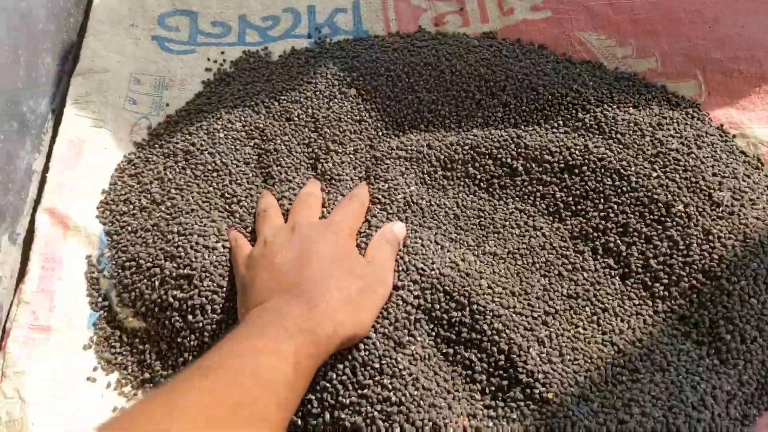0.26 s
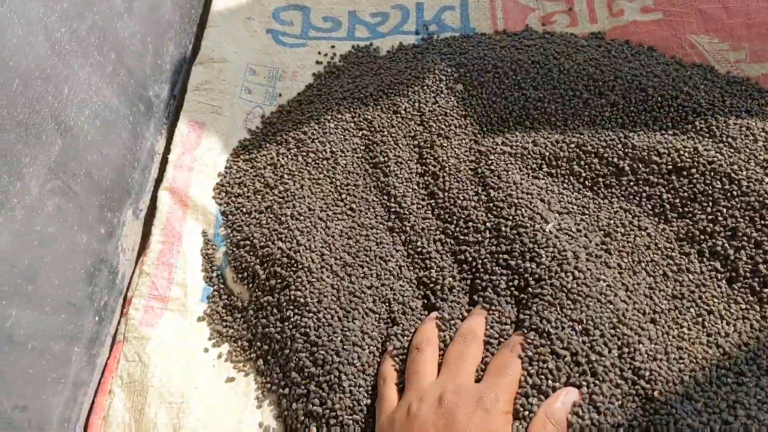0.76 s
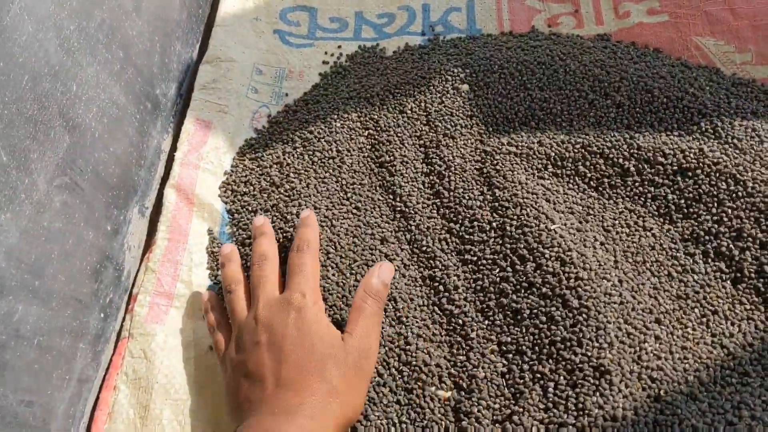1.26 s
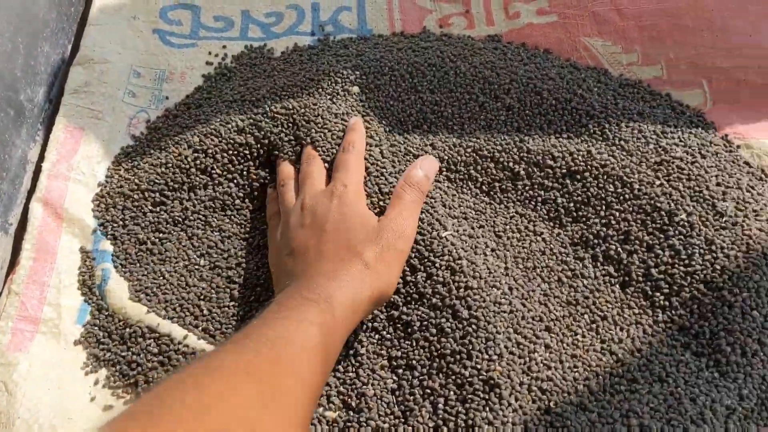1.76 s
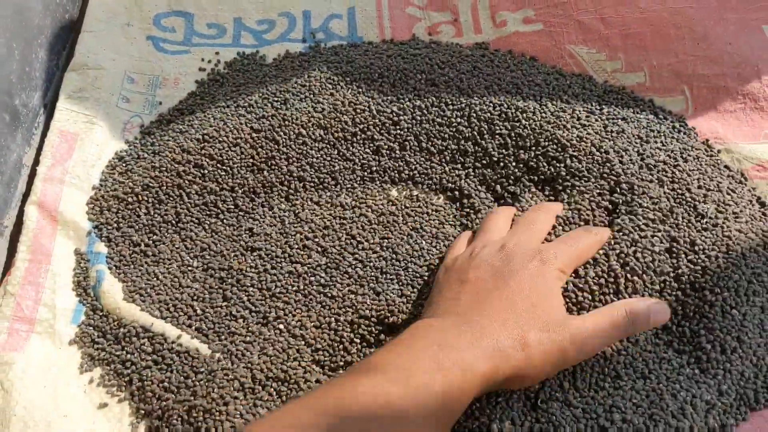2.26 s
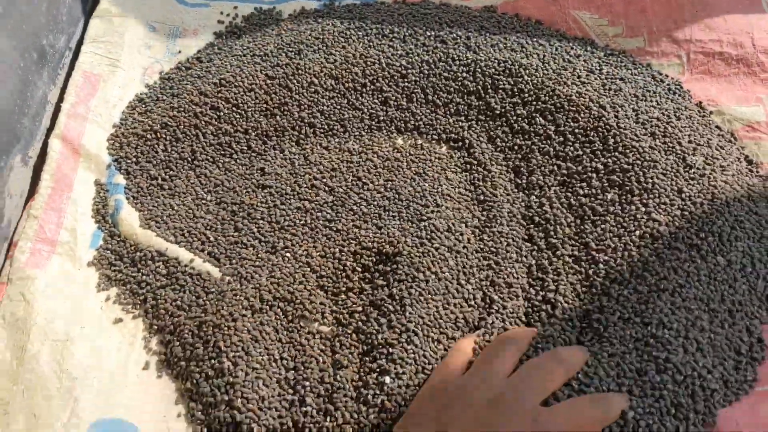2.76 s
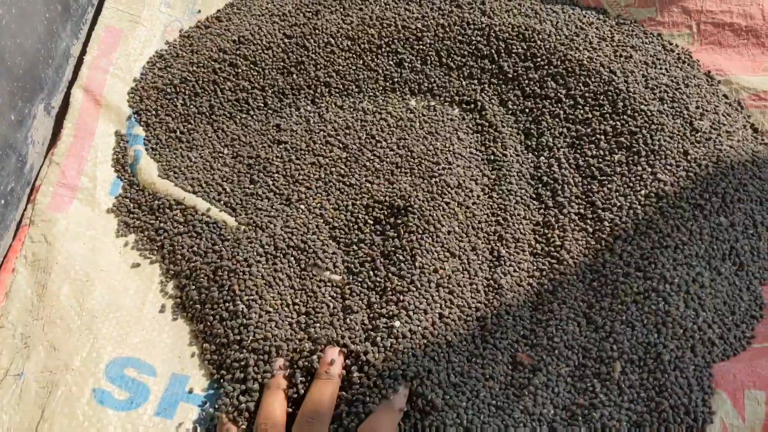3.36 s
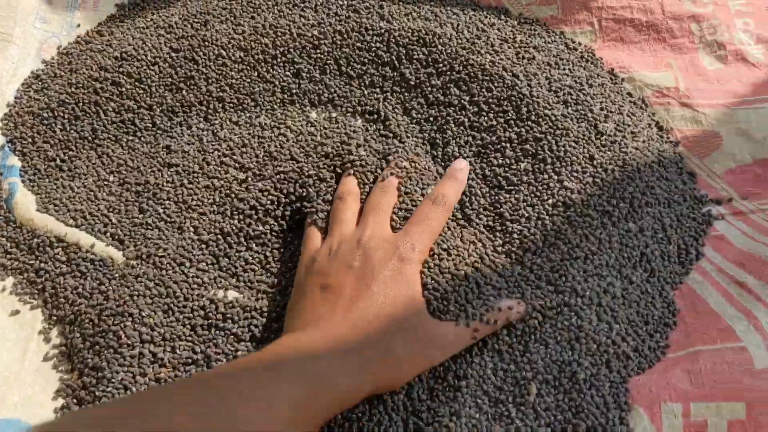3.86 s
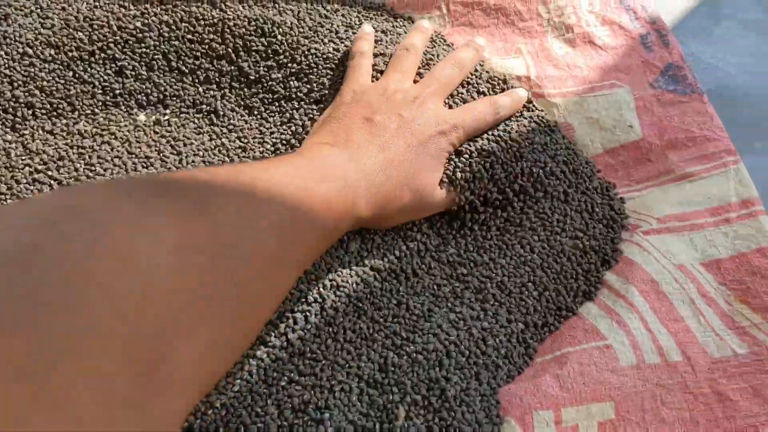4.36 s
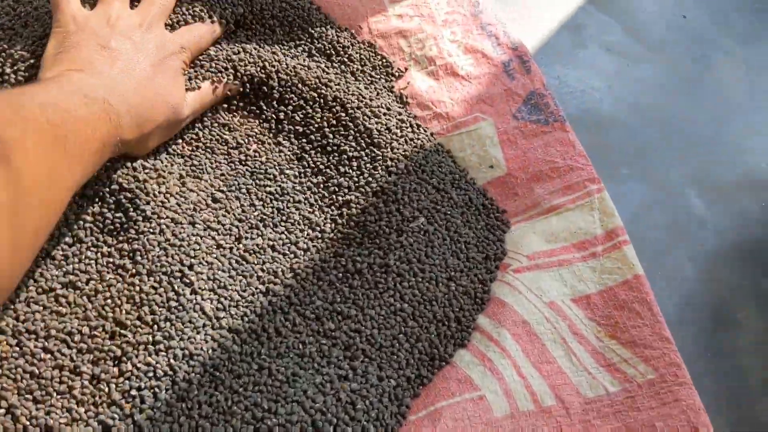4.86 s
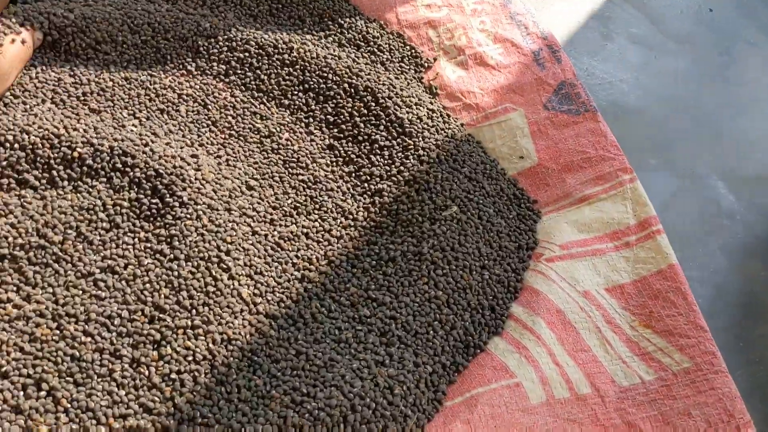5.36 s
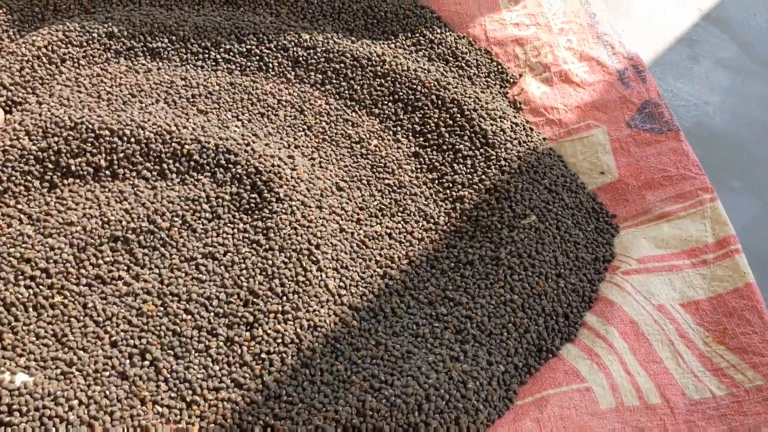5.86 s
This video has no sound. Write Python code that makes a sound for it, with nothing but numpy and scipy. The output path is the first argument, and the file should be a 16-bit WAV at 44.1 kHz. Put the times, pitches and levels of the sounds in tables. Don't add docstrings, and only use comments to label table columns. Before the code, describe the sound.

A hand sweeps a heap of small dry seeds on a woven plastic sack, crunching, scraping and hissing, with light wind puffs outdoors.

```python
import sys
import numpy as np
from scipy import signal
from scipy.fft import rfft, irfft
from scipy.io import wavfile
from scipy.ndimage import uniform_filter1d

SR = 44100
rng = np.random.default_rng(int(sys.argv[2]) if len(sys.argv) > 2 else 0)


def log_audio(samples):
    frames = np.atleast_2d(samples).T
    limited = np.clip(frames, -1, 1)
    pcm = np.round(limited * 32767).astype(np.int16)
    wavfile.write(sys.argv[1], SR, pcm)


N = 269010


def gain_of(db):
    return 10 ** (np.asarray(db) / 20)


def evened(x):
    return x / np.sqrt(np.mean(x ** 2) + 1e-20)


def read(points, hz):
    f, value = np.transpose(points)
    return np.interp(np.log(hz + 1), np.log(f + 1), value)


def along(rows, column):
    columns = np.transpose(rows)
    return np.interp(np.arange(N) / SR, columns[0], columns[column])


def sides(db):
    return gain_of(np.multiply.outer([0.5, -0.5], db))


def add(mix, s, sound):
    part = mix[:, round(s * SR):][:, :sound.shape[1]]
    part += sound[:, :part.shape[1]]


def drift(per_s):
    t = np.arange(0, N + 64, 64) / SR
    slow = sum(np.sin(2 * np.pi * (f * t + rng.random())) for f in np.geomspace(3, per_s, num=24))
    return evened(np.interp(np.arange(N) / SR, t, slow))


def swelling(s, rise, fall, db):
    t = np.arange(0, N, 8) / SR - s
    level_db = db - 9 * (t / np.where(t < 0, rise, fall)) ** 2
    return np.repeat(gain_of(2 * level_db), 8)[:N]


def humps_db(rows):
    t = np.arange(N) / SR
    return sum(db * np.exp(-((t - s) / half) ** 2) for s, half, db in rows)


# (pitch_hz, share)
SAME_AT_PORTS = [(60, 0.91), (200, 0.94), (450, 0.78), (750, 0.87), (1200, 0.67), (1600, 0.48),
                 (2000, 0.22), (3300, 0.35), (6000, 0.24), (15000, 0.031)]


def port_pair(hz, shared_left, shared_right, private):
    alike = np.clip(read(SAME_AT_PORTS, hz), 0, 1)
    return np.sqrt(alike) * np.array([shared_left, shared_right]) + np.sqrt(1 - alike) * private


# (pitch_hz, level_db per Hz)
HUM_COLOUR = [(15, -67), (25, -70), (35, -73), (48, -19), (70, -7), (102, -16), (139, -1), (205, -9),
              (221, -7), (272, -29), (330, -32.5), (430, -23), (730, -120)]
# (peak_s, half_length_s, level_db)
HUM_SWELLS = [
    (.0, 0.45, 2.5),
    (1.05, 0.4, 3),
    (1.75, .15, -4),
    (2.45, 0.68, 1.5),
    (3.9, 0.22, -3.5),
    (4.198, 0.17, 1.5),
    (5.14, 0.28, 3),
    (5.45, 0.14, -3.5),
]
# (pitch_hz, level_db, width_hz)
MOTOR_NOTE = (198, -64.5, 3.6)


def hum():
    hz = np.fft.rfftfreq(N, 1 / SR)
    shared, left, right = rfft(rng.standard_normal((3, N)))
    pair = port_pair(hz, shared, shared, np.array([left, right]))
    air = evened(irfft(pair * gain_of(read(HUM_COLOUR, hz)), N))
    air = air * gain_of(-54.5 + humps_db(HUM_SWELLS))
    note_hz, note_db, width = MOTOR_NOTE
    motor = evened(irfft(pair / (1 + (2 * (hz - note_hz) / width) ** 2), N))
    return air + gain_of(note_db) * motor


# (pitch_hz, level_db per Hz)
GUST_COLOUR = [(20, -36), (40, 4), (70, -4.5), (82, 10), (160, -6.5), (300, -43)]
# (peak_s, rise_s, level_db, left_minus_right_db, pitch_factor)
WIND_PUFFS = [
    (1.12, 0.081, -50, -3, 1.2),
    (1.196, 0.018, -36.5, 1, 1.45),
    (1.232, 0.022, -28.5, 2, 1.28),
    (1.34, 0.092, -47.5, 1, 1.1),
    (1.53, 0.027, -35.5, 1, 1.47),
    (1.6, 0.066, -45, 1, 1.35),
    (1.672, 0.034, -38.5, -3, 1.4),
    (4.04, 0.047, -45.5, -2, 0.87),
    (4.13, 0.085, -45.5, 0, 1.23),
    (4.22, 0.067, -41.5, 1, 0.91),
]


def wind():
    hz = np.fft.rfftfreq(N, 1 / SR)
    out = np.zeros((2, N))
    white = rfft(rng.standard_normal((2, N)))
    for s, rise, db, pan, pitch in WIND_PUFFS:
        lumps = irfft(white * gain_of(read(GUST_COLOUR, hz / pitch)), N)
        lumps /= np.sqrt(abs(uniform_filter1d(lumps ** 2, size=2500, axis=1)) + 1e-12)
        puff = swelling(s, rise, 0.69 * rise, db)
        out += lumps * np.sqrt(puff) * sides(pan)[:, None]
    return out


# (pitch_hz, late_ms)
LEFT_LATE = [(300, .02), (600, 0.048), (950, 0.24), (1300, 0.25), (1700, 0.35), (3000, 0.51),
             (5000, 0.5175)]
# (time_s, share of the delay)
HAND_BEARING = [(0.0, 1.35), (.5, 1.13), (.8, 1), (1.05, 0.71), (1.35, 0.09), (1.6, 0.97), (1.95, 1.07),
                (2.25, 0.63), (2.55, 0.65), (2.8, 0.094), (3.15, 0.26), (3.45, .6), (3.75, 0.85),
                (4.1, 0.86), (4.35, 0.58), (4.65, 0.81), (5.2, 1.18), (6.1, 1.38)]


def lag_s(hz, s):
    follows = np.clip((2300 - hz) / 800, 0, 1)
    bearing = np.interp(s, *np.transpose(HAND_BEARING))
    return read(LEFT_LATE, hz) / 1000 * (1 + follows * (bearing - 1))


def rings(rows, cycles):
    out = np.zeros((2, N))
    t = np.arange(6000) / SR
    for s, db, hz, scuff_s, pan in rows:
        ring = t * gain_of(-120 * t * hz / cycles) * np.sin(2 * np.pi * hz * t)
        scuff = rng.standard_normal(len(t)) * (t < scuff_s)
        knock = signal.fftconvolve(ring, scuff)
        late = round(lag_s(hz, s) * SR)
        pair = np.array([np.roll(knock, late), knock]) / abs(knock).max()
        add(out, s, gain_of(db) * sides(pan)[:, None] * pair)
    return out


# (start_s, peak_db, pitch_hz, push_s, left_minus_right_db)
WIND_BLOWS = [
    (1.183, -31, 80, .002, 8),
    (1.223, -24, 85.5, .002, 11),
    (1.522, -33, 110, .002, -4),
    (4.16, -38.5, 58, .002, 4),
]


def buffets():
    return rings(WIND_BLOWS, cycles=8.7)


# (start_s, peak_db, pitch_hz, scuff_s, left_minus_right_db)
GRIP_KNOCKS = [
    (4.195, -37.5, 640, 0.0099, 3),
    (6.008, -26.5, 440, 0.00054, 3),
    (6.049, -25, 447, 0.00073, 2),
    (6.0978, -26, 605, 0.0005, .3),
]
# (start_s, peak_db, pitch_hz, scuff_s, left_minus_right_db)
RING_CLICKS = [
    (4.1756, -25.5, 2550, .0004, 12),
    (4.178, -23, 2450, .0004, 12),
    (4.179, -29.5, 3550, .0004, 12),
    (4.1803, -22, 2650, .0004, 12),
    (4.179, -36, 4400, .001, 10),
    (4.1785, -36, 1600, .002, 8),
    (4.183, -32, 2800, .0004, 12),
]


def case_taps():
    return rings(GRIP_KNOCKS, cycles=10.6) + rings(RING_CLICKS, cycles=21)


# (start_s, peak_db, pitch_hz, scuff_s, left_minus_right_db)
SACK_RUBS = [(1.505, -38, 1160, 0.02, 3), (1.556, -44, 706, 0.013, 2), (1.78, -34, 1880, 0.026, -1),
             (2.065, -36, 1960, 0.0089, 2), (2.262, -39, 1100, .014, 3), (2.30, -41, 690, .03, 1),
             (2.655, -43, 398, .025, 0), (2.672, -36, 750, 0.016, 0), (2.64, -38, 1060, 0.018, 1),
             (2.72, -40, 640, 0.015, 0), (2.745, -35, 940, 0.026, 0), (2.795, -35, 786, .03, -4),
             (2.915, -40.5, 377, .07, 1), (2.955, -43, 600, 0.015, 0), (3.05, -56, 403, 0.063, -1),
             (3.49, -38, 1350, .02, 2), (3.57, -38, 756, .03, -2), (3.605, -39, 1160, .02, -1),
             (3.70, -35, 1820, .02, 3), (4.187, -44, 3500, .003, 6), (4.193, -44, 4200, 0.0059, 4),
             (4.08, -40, 2052, 0.045, 1), (4.62, -29, 4200, .04, 5), (4.99, -38, 503, 0.053, 0),
             (5.055, -41, 520, 0.014, 0), (5.105, -41, 635, .02, 0), (5.17, -41, 654, 0.033, 4),
             (5.323, -45, 483, .008, -2), (1.10, -38, 1700, .06, 1), (1.17, -37, 1590, 0.049, -1),
             (1.76, -42, 763, 0.071, 1), (2.69, -37, 1500, .04, -3), (2.684, -37, 2100, 0.0018, 0),
             (2.632, -40, 1900, .002, -1), (4.34, -35, 2100, .02, 1), (5.65, -40, 1500, 0.14, 1),
             (5.78, -39, 1550, .1, 1), (1.0, -35, 2000, .1, -1), (2.19, -38, 1320, .04, 2)]


def rubs():
    return rings(SACK_RUBS, cycles=28)


# (start_s, peak_db, pitch_hz, scuff_s, left_minus_right_db)
GAP_SCRAPES = [(.011, -33, 2230, .04, 2), (.101, -36, 1850, 0.034, 0), (.121, -38, 683, 0.019, 3),
               (.166, -31, 1700, 0.058, 5), (.236, -32, 1730, .02, 0), (1.056, -33, 2500, 0.032, 7),
               (1.076, -33, 1500, .03, -5), (1.483, -27.5, 1180, .004, 9), (1.496, -33.5, 1190, 0.04, 2),
               (1.498, -32.5, 680, 0.016, 0), (1.546, -36.5, 1280, .025, 4), (2.177, -34, 1250, .03, 8),
               (2.221, -40, 1200, 0.092, 1), (2.366, -38, 1270, 0.06, 7), (2.453, -36.5, 1250, 0.039, 7),
               (2.778, -27, 1620, 0.039, -6), (2.821, -28, 1880, .02, 5), (2.886, -30, 2410, 0.033, 2),
               (2.906, -34, 1500, 0.026, 2), (2.961, -35, 1500, 0.04, -2), (2.99, -28, 2500, 0.026, 6),
               (3.076, -31, 2430, 0.038, 0), (3.241, -27, 2300, 0.017, -2), (3.271, -28, 2520, 0.053, 6),
               (3.493, -33, 2620, 0.022, 3.5), (3.706, -28, 3200, .025, 3), (3.811, -26, 3000, .012, 5),
               (4.456, -27, 1390, 0.021, -7), (4.486, -28, 1360, 0.013, -5), (4.491, -26, 5300, .025, 2),
               (4.566, -31, 1450, .02, 1), (4.576, -31, 1000, 0.024, -3), (4.601, -29, 2100, 0.023, -5),
               (4.641, -29, 1050, 0.026, 3), (4.704, -33, 2300, 0.017, 1), (4.706, -29.5, 675, 0.058, 0),
               (5.39, -43.5, 547, 0.015, 0)]


def scrapes():
    return rings(GAP_SCRAPES, cycles=20.4)


# (start_s, peak_db, pitch_hz, scuff_s, left_minus_right_db)
HEAP_SLIPS = [(1.4768, -30, 990, 0.0048, 2), (1.49, -39, 756, 0.12, 2), (2.135, -40, 740, 0.2, 1),
              (2.27, -40, 770, 0.044, 3), (2.367, -41.5, 800, 0.059, 2), (2.633, -54, 394, 0.031, 1.5),
              (3.92, -28, 1500, 0.0066, 3), (4.179, -43, 444, 0.0043, -1), (4.33, -37, 1260, 0.054, -5),
              (4.47, -23.5, 4970, 0.061, 8), (4.574, -35, 1190, .016, 1.5), (4.644, -39, 1300, .014, 3),
              (4.70, -43, 710, 0.15, 4), (6.0495, -25, 2300, 0.0011, 2), (6.054, -25, 2180, 0.0051, 2)]


def slips():
    return rings(HEAP_SLIPS, cycles=8)


# (start_s, peak_db, pitch_hz, scuff_s, left_minus_right_db)
SEED_SNAPS = [(.92, -35, 3060, .002, 2), (1.607, -27, 5300, .002, 1.5), (1.653, -27, 6340, .002, 1.5),
              (1.698, -28, 3990, .002, 1), (2.014, -32, 6250, .002, 2.5), (2.369, -30, 1500, 0.0011, 5),
              (2.6305, -25, 1100, 0.001, 1), (2.6825, -20, 1460, 0.0018, -3), (2.791, -21, 1600, .002, 1.5),
              (2.807, -27, 1400, .004, -1), (2.826, -27, 1900, 0.0015, 1.5), (3.461, -32, 1380, .002, 0),
              (3.833, -26, 5830, .003, -1), (4.178, -44, 4600, .004, 11), (4.577, -26, 2500, 0.0046, 7),
              (4.653, -20, 2000, 0.0044, 1), (4.708, -20, 1800, 0.0015, 1), (4.815, -23, 1300, .002, 1),
              (4.847, -27, 1200, 0.0026, 7), (5.031, -24, 1300, 0.0026, 4), (5.053, -27, 1810, .0043, 6),
              (5.903, -33, 700, 0.0026, .5)]


def snaps():
    return rings(SEED_SNAPS, cycles=5.5)


# (start_s, peak_db)
FLUNG_SEEDS = [
    (3.4615, -10),
    (3.6794, -36),
    (4.5736, -20),
]


def flicks():
    out = np.zeros((2, N))
    t = np.arange(6000) / SR
    for s, db in FLUNG_SEEDS:
        tick = rng.standard_normal((2, len(t))) * gain_of(-60 * t / 0.023)
        add(out, s, gain_of(db - 18) * tick)
    return out


# (time_s, speed_db, lightness_db, left_minus_right_db)
HAND_PATH = [(0.0, -36, -6, -2), (.2, -41.5, -1.5, 0.5), (.51, -45, -1, 0.5), (.7, -39, -1.5, 0),
             (1.07, -37.5, -3.5, 1), (1.25, -51, 0, 3), (1.52, -46, -5, 0), (1.95, -39, -1, -1),
             (2.3, -41.5, -1, 1), (2.56, -37.5, -3.5, 0.5), (3.3, -37, -2.5, 1.5), (3.8, -39, -1.5, -0.9),
             (4.25, -48.5, 1, 0), (4.45, -36.5, -4.5, -0.9), (4.9, -36.5, -6, 0), (5.3, -42, -2, -0.5),
             (5.68, -41.5, -3.5, 0.5), (6.1, -35.5, -3, 0)]
# (deepest_s, rise_s, fall_s, force_db, depth_db)
FINGER_DIGS = [(.03, .1, 0.13, -37, -2.5), (.18, 0.11, 0.093, -34, -4), (.3, 0.049, 0.09, -39.5, -1),
               (1.09, 0.23, 0.1, -41, -23), (1.2, 0.12, 0.084, -43, -9.5), (1.61, 0.076, 0.21, -43, -2.5),
               (2.27, 0.15, 0.091, -54, 8.5), (2.47, 0.21, 0.074, -45, -3), (2.81, 0.12, 0.049, -35.5, -3),
               (2.96, 0.21, 0.12, -33.5, -5), (3.09, 0.086, 0.12, -37, -8.5), (3.27, 0.15, 0.14, -36, -7),
               (3.56, 0.16, 0.081, -45.5, -6), (3.76, 0.11, 0.19, -41.5, -10),
               (3.89, 0.099, 0.16, -40, -16), (4.5, 0.15, 0.067, -41, -3), (4.58, 0.085, 0.071, -32.5, -1),
               (4.65, 0.049, 0.1, -36.5, -1), (4.72, 0.055, 0.11, -36, 0.5), (4.87, 0.092, 0.082, -39, -9),
               (5.04, 0.44, 0.11, -39.5, 0), (5.9, 0.084, 0.058, -48, 0), (6.05, 0.063, 0.04, -42, -2.5),
               (.41, .08, 0.21, -46.5, -2),
    (1.38, 0.3, 0.31, -49.5, -3.5),
    (5.21, 0.09, 0.13, -47.5, 0),
    (5.55, 0.25, 0.092, -50, -7),
]
# (peak_s, rise_s, fall_s, level_db, lightness_db)
TOP_SLIDES = [(.06, 0.043, 0.086, -41.5, -2), (1.61, 0.028, 0.21, -49, -14), (2.05, 0.14, 0.38, -42.5, -4),
              (3.48, 0.038, 0.041, -39, 2.5), (3.67, 0.021, 0.075, -52, 11), (3.82, 0.06, 0.07, -43, -13),
              (4.49, 0.12, 0.07, -36.5, -12), (4.6, 0.11, 0.15, -35.5, -22), (5.92, 0.16, 0.033, -42.5, -8),
              (4.1, .1, .1, -49.5, 1), (5.15, .12, .15, -52, 6), (1.1, .1, .08, -58, 4)]
# (peak_s, rise_s, fall_s, level_db)
SACK_SHIFTS = [
    (.0, .1, 0.19, -47.5),
    (.4, 0.26, .08, -53.5),
    (1.12, 0.034, 0.095, -51),
    (1.37, 0.16, 0.11, -63),
    (1.6, 0.4, 0.16, -55),
    (2.95, 0.049, 0.063, -61),
    (3.5, 0.08, 0.089, -53),
    (5.2, .12, 0.083, -53.5),
]
# (time_s, half_length_s, level_db)
CRUNCH_DIPS = [
    (0.598, .06, -3.5),
    (1.98, 0.041, -7.5),
    (2.586, 0.045, -4),
    (3.7, 0.036, -2),
    (3.9, 0.13, -2.5),
    (4.28, 0.028, -1),
]


def touch():
    speed = gain_of(2 * along(HAND_PATH, column=1))
    lightness = gain_of(2 * along(HAND_PATH, column=2))
    dug = deep = slid = light_slid = 0
    for *swell, depth_db in FINGER_DIGS:
        power = swelling(*swell)
        dug = dug + power
        deep = deep + power * gain_of(2 * depth_db)
    for *swell, lightness_db in TOP_SLIDES:
        power = swelling(*swell)
        slid = slid + power
        light_slid = light_slid + power * gain_of(2 * lightness_db)
    crunch = deep + speed * gain_of(2 * -12.5)
    plough = dug + speed * gain_of(2 * -6.5)
    patter = speed + slid + dug * gain_of(2 * -10.5)
    fizz = speed * lightness + light_slid
    lingering = abs(uniform_filter1d(deep, round(0.04 * SR)))
    sack = lingering * gain_of(2 * -17.5) + speed * gain_of(2 * -21.5)
    sack = sack + sum(swelling(*row) for row in SACK_SHIFTS)
    dipped = gain_of(2 * humps_db(CRUNCH_DIPS))
    return crunch * dipped, plough, patter, fizz, sack * dipped


# (time_s, palm_hz, fingers_hz)
HAND_HOLLOWS = [(0.0, 750, 1930), (.3, 750, 1790), (.7, 1040, 2540), (1.08, 1350, 2720), (1.5, 1190, 2270),
                (1.7, 800, 2220), (2.3, 1170, 2160), (2.78, 1450, 1790), (2.93, 1450, 2550),
                (3.35, 1400, 2280), (3.58, 800, 2500), (3.8, 1290, 3140), (4.2, 1206, 2410),
                (4.6, 1210, 1900), (4.72, 670, 2240), (5.2, 694, 1980), (5.6, 1250, 1950), (6.1, 700, 2170)]
# (width_hz, lift_db)
CUP_LIFT = [
    (400, 0.5),
    (550, 2.5),
    (1800, 3.5),
]


def hollows():
    palm, fingers = along(HAND_HOLLOWS, column=1), along(HAND_HOLLOWS, column=2)
    patter = 4750 - 0.41 * (fingers - fingers.mean())
    cups = [(hz, *cup) for hz, cup in zip((palm, fingers, patter), CUP_LIFT)]
    return cups + 2 * [(np.ones(N), 1, 0)]


def at_ports(trains, colour, patch_db, hollow):
    hz, t, z = signal.stft(trains, SR, nperseg=1024)
    hz = hz[:, None]
    late = np.exp(-2j * np.pi * hz * lag_s(hz, t))
    pair = port_pair(hz, late * z[0], z[0], z[1:])
    patches = rng.standard_normal(z[0].shape)
    patches = uniform_filter1d(patches, size=5, axis=0)
    patches = evened(uniform_filter1d(patches, size=8, axis=1))
    centre, width, lift_db = hollow
    centre = centre[np.minimum(t * SR, N - 1).astype(int)]
    cup_db = lift_db / (1 + (2 * (hz - centre) / width) ** 2)
    gain = gain_of(read(colour, hz) + cup_db)
    gain = gain / np.sqrt(np.mean(gain ** 2, axis=0))
    coloured = pair * gain * gain_of(patch_db * patches)
    return evened(signal.istft(coloured, SR, nperseg=1024)[1][:, :N])


# (pitch_hz, level_db per Hz)
CRUNCH_COLOUR = [(350, -56), (560, -1), (680, -2), (900, 1.5), (1300, 6.5), (1600, 2), (2500, -41)]
PLOUGH_COLOUR = [(700, -19.5), (1200, -6), (1500, 0.5), (1900, -0.5), (2500, -1.5), (2850, -3.5),
                 (3200, -5), (5000, -17)]
PATTER_COLOUR = [(1500, -24), (2700, 0.5), (3600, -1), (5000, -2), (6500, -2), (8500, -5), (11000, -5.5),
                 (16000, -24)]
FIZZ_COLOUR = [(6000, -14.5), (8500, -1.5), (10500, -2), (12500, 0), (14000, 0.5), (15500, -2),
               (17000, -38)]
SACK_COLOUR = [(150, -29), (240, -13), (320, 3), (420, 1), (540, -4.5), (700, 2.5), (1200, -49)]
# (collisions per second, size_spread_db, patchiness_db)
COLLISIONS = [
    (2880, -0.8, 2),
    (6060, 1.5, 1),
    (17470, 2, 1.25),
    (21700, -0.5, 1.5),
    (1500, 1, 2.35),
]


def seeds():
    out = np.zeros((2, N))
    surge = gain_of(0.44 * drift(14))
    place = along(HAND_PATH, column=3)
    high = place - place.mean()
    low = 0.48 * high
    pans = (low, high, high, high, low)
    colours = (CRUNCH_COLOUR, PLOUGH_COLOUR, PATTER_COLOUR, FIZZ_COLOUR, SACK_COLOUR)
    layers = zip(colours, COLLISIONS, touch(), pans, hollows())
    for colour, (per_s, spread_db, patch_db), power, pan, hollow in layers:
        chance = rng.random((3, N)) * SR / per_s
        size = gain_of(spread_db * np.clip(-np.log(chance + 1e-9), 0, 3.5))
        clicks = size * rng.standard_normal((3, N)) * (chance < 1)
        out += at_ports(clicks, colour, patch_db, hollow) * np.sqrt(2 * power) * sides(pan)
    return out * surge


def scene():
    background = hum() + wind() + buffets() + case_taps()
    single_sounds = rubs() + scrapes() + slips() + snaps() + flicks()
    return background + single_sounds + seeds()


def band_limit(x):
    return signal.sosfilt(signal.butter(12, 16500, fs=SR, output="sos"), x)


# (pitch_hz, width_hz, lift_db)
PHONE_RESONANCES = [(688, 40, 2), (1004, 15, 3), (1850, 44, 4.5), (2550, 110, 0), (5300, 61, 2),
                    (6340, 140, 4.5), (6850, 60, 7.5), (12170, 200, 5),
                    (12900, 280, 2.5), (13780, 220, 8), (14670, 190, 7), (15350, 180, 2.5)]
# (pitch_hz, left_minus_right_db)
PORT_BALANCE = [(60, 1.5), (130, 0), (270, -1), (740, -1.5), (1300, 1.5), (3300, 3.5), (6000, 2.5),
                (9000, 4), (11500, -1)]
# (pitch_hz, level_db)
LEFT_DULLNESS = [(11500, 0), (12400, -6), (13400, -10), (14200, -12), (14900, -14), (15100, -20),
                 (15600, -22)]


def record(dry):
    hz = np.fft.rfftfreq(N, 1 / SR)
    resonances = PHONE_RESONANCES
    lift_db = sum(db / (1 + (2 * (hz - f) / width) ** 2) for f, width, db in resonances)
    ports = sides(read(PORT_BALANCE, hz)) * gain_of([read(LEFT_DULLNESS, hz), 0 * hz])
    heard = irfft(rfft(dry) * gain_of(lift_db) * ports, N)
    thin_hz, edge_hz = 12000, 15590
    hz, _, z = signal.stft(heard, SR, nperseg=2048, noverlap=1024)
    band = uniform_filter1d(abs(z) ** 2, size=8, axis=1)
    top = band[:, (hz > thin_hz) & (hz < edge_hz)].mean(axis=1).max(axis=0)
    strong = band > gain_of(2 * -11) * top
    kept = (strong | (hz < thin_hz)[:, None]) & (hz < edge_hz)[:, None]
    heard = signal.istft(z * kept, SR, nperseg=2048, noverlap=1024)[1][:, :N]
    return band_limit(heard)


dry = scene()
out = record(dry)
log_audio(out)
```